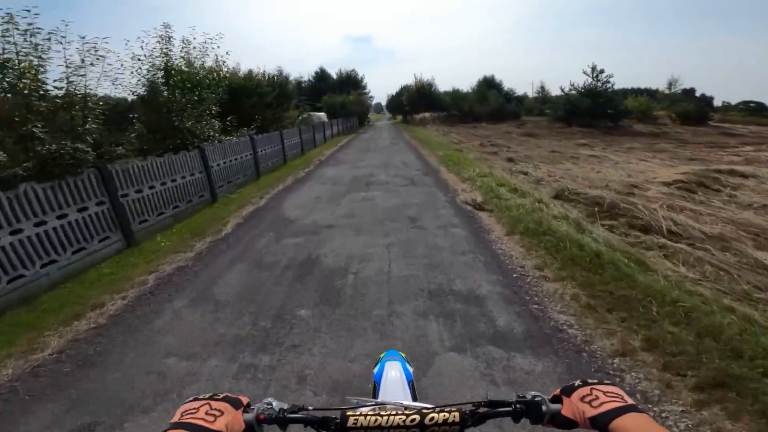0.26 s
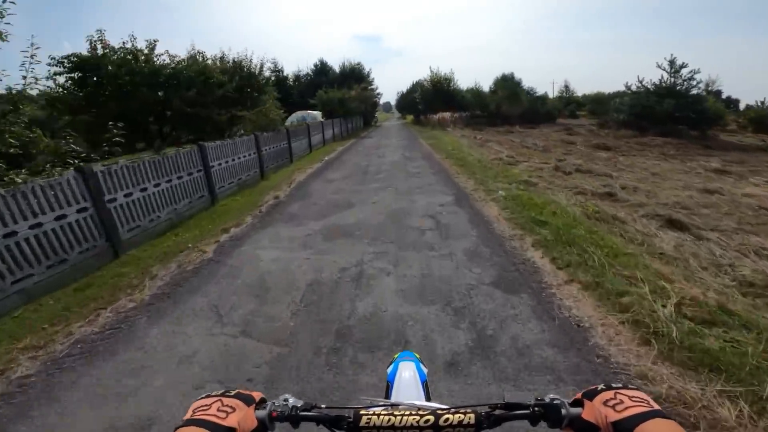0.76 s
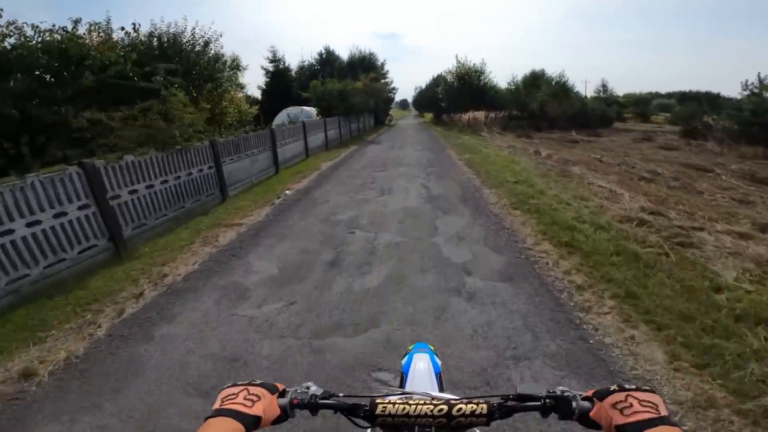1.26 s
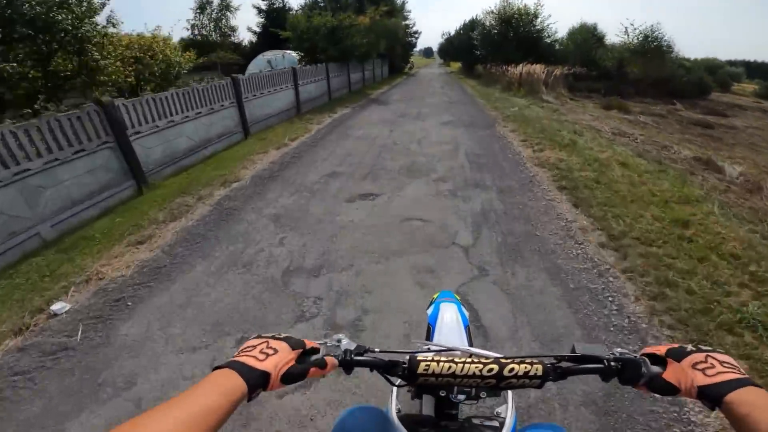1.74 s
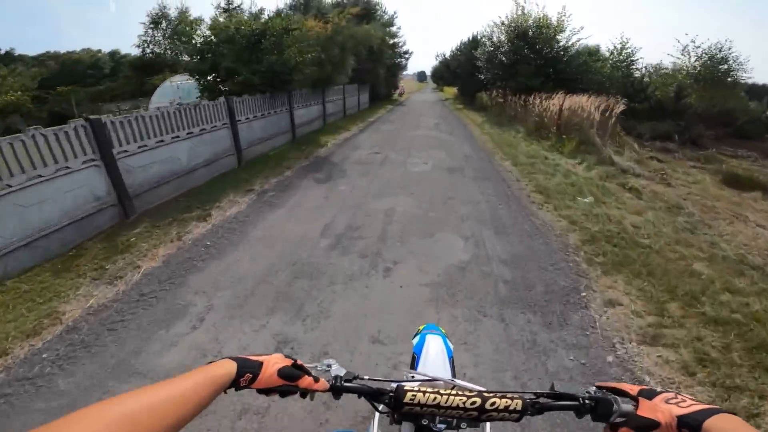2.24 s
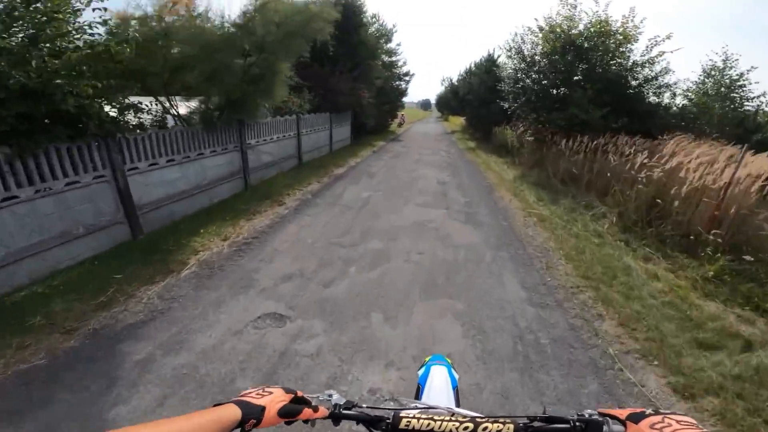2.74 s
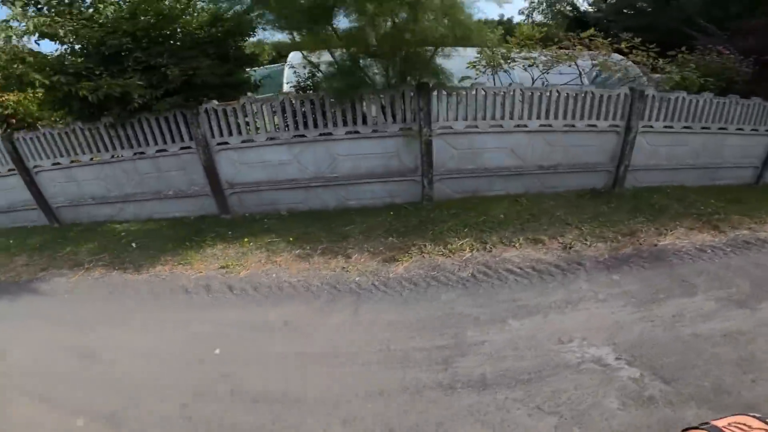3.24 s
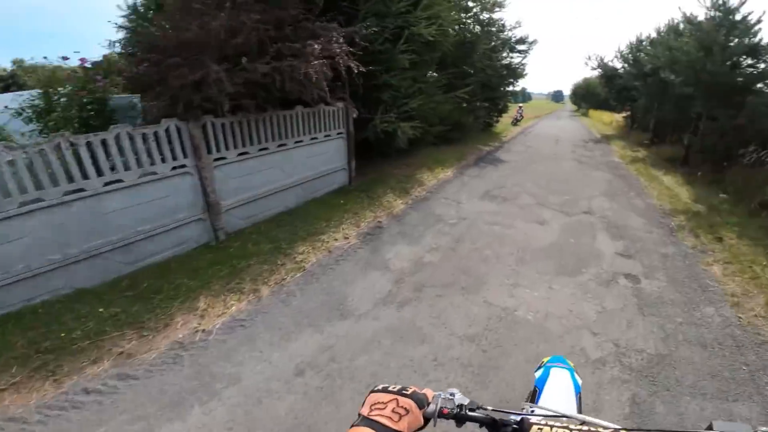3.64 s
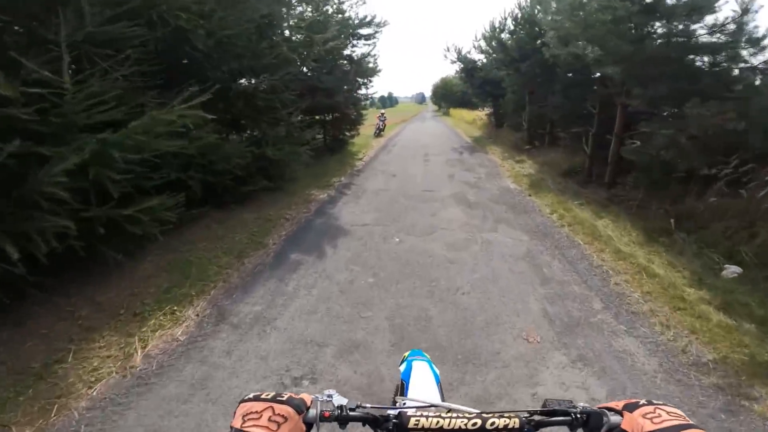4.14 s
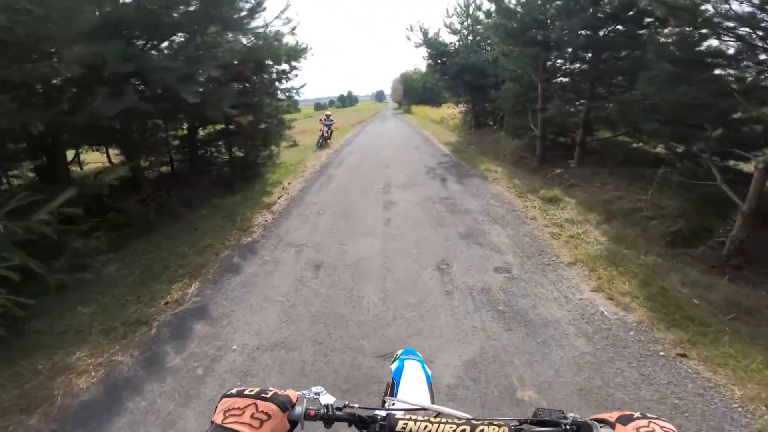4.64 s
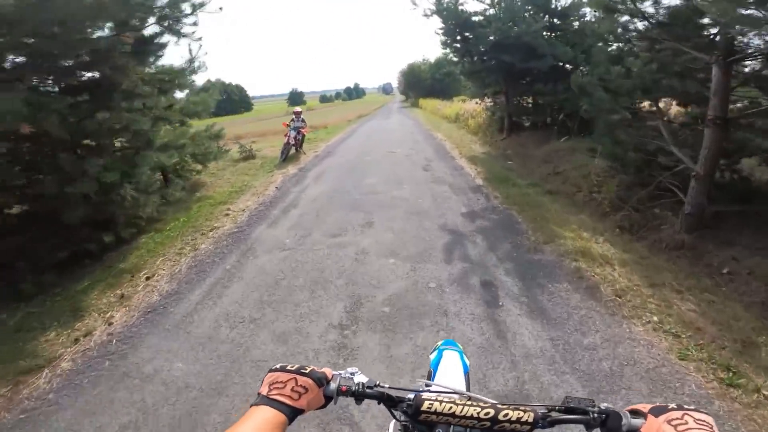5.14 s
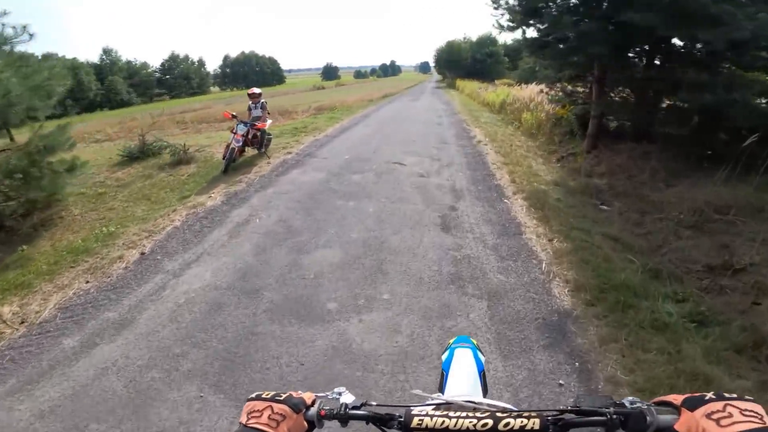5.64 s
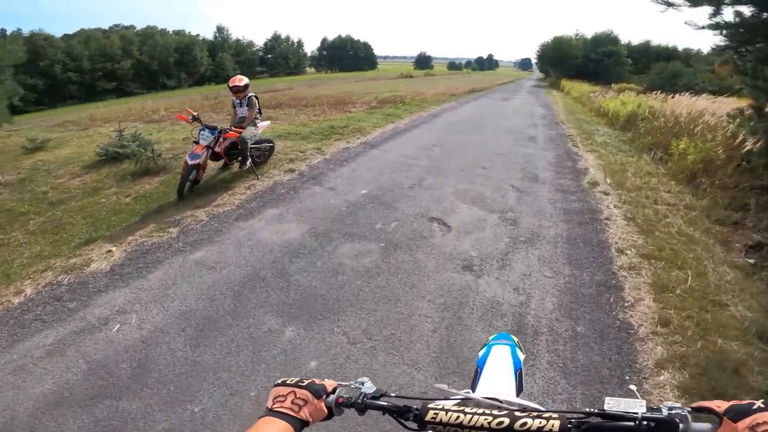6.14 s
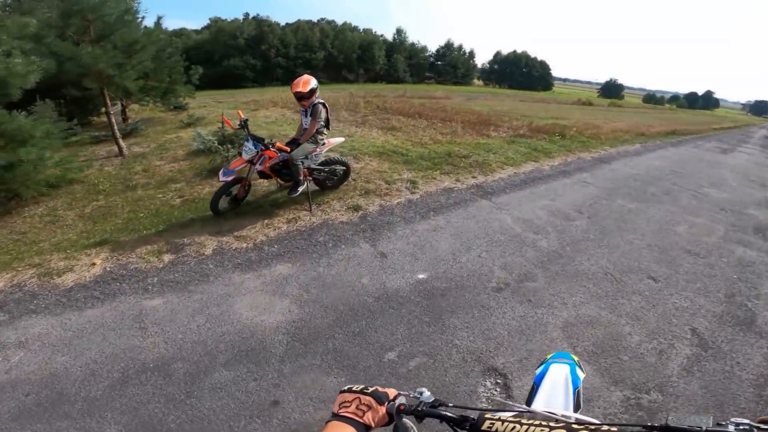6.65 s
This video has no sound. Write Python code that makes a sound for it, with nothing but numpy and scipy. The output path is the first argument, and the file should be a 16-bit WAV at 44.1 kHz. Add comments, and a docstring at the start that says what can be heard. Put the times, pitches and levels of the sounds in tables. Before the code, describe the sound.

Close helmet microphone on a small four-stroke dirt bike in the open air, no echo. The engine putters steadily with clatter, tyre roll and wind, then blips sharply and sinks to a weak idle. Side wind roars briefly as the rider turns his head, braking tyres rush with a thin disc whistle, and finally the rear tyre skids with a hoarse, juddering groan over grit.

```python
"""A single-cylinder dirt bike on a country lane, heard from the rider's helmet.
It cruises: gas pulses ring the exhaust, noise makes clatter, wind and tyre roll, a thin tone whines.
One rev sweeps the exhaust modes, the intake gasps and the chain rattles; the engine drops to idle.
Side wind, as shaped noise, roars while the rider turns his head; braking scrubs the tyres and
sings in the disc, then the rear tyre skids: friction-driven rubber resonances over grinding grit."""
import sys
import numpy as np
from scipy.fft import rfft, irfft, next_fast_len
from scipy.io import wavfile
from scipy.ndimage import uniform_filter1d, map_coordinates

SR = 44100
rng = np.random.default_rng(int(sys.argv[2]) if len(sys.argv) > 2 else 0)


def wav_out(sig):
    """Save sig, one row per channel (or a flat mono array), as 16-bit PCM at SR to the path in sys.argv[1]."""
    wavfile.write(sys.argv[1], SR, np.round(np.clip(np.atleast_2d(sig).T, -1, 1) * 32767).astype(np.int16))


N = 303923

# the throttle shuts and the engine settles to idle; each change takes SNAP_S (s)
SHUT_S, IDLE_S, SNAP_S = 1.665, 2.79, .03


def amp(db):
    """Level: decibels to amplitude gain."""
    return 10 ** (np.asarray(db) / 20)


def unit(x):
    """Normalisation: x at an rms of 1."""
    return x / np.sqrt(np.mean(x ** 2) + 1e-20)


def clock():
    """Sampling: the time of every sample in seconds."""
    return np.arange(N) / SR


def white():
    """White noise: equal power at every frequency."""
    return rng.standard_normal(N)


def wobble(rate):
    """Slow random modulation: a smooth curve through rate random knots a second."""
    return map_coordinates(rng.standard_normal(int(N * rate / SR) + 4), [clock() * rate])


def curve(points):
    """Linear interpolation: (time_s, value) points as one value per sample."""
    return np.interp(clock(), *np.transpose(points))


def after(s):
    """Transition: a quick fade from 0 to 1 at time s."""
    return np.clip((clock() - s) / SNAP_S, 0, 1)


def swells(rows, rise, fall, sag_db_per_s=0):
    """Exponential envelope: each (start_s, end_s, level_db) event rises, holds or sags, then decays."""
    t, gain = clock(), np.zeros(N)
    for start, end, db in rows:
        outside = np.maximum(start - t, 0) / rise + np.maximum(t - end, 0) / fall
        sagged_db = db - sag_db_per_s * np.maximum(t - start, 0)
        gain = np.maximum(gain, amp(sagged_db) * np.exp(-outside))
    return gain


def filtered(x, response):
    """Linear filtering: the spectrum of x times a response given as a function of frequency."""
    padded = next_fast_len(N + SR // 2)
    spectrum = rfft(x, padded) * response(np.fft.rfftfreq(padded, 1 / SR))
    return irfft(spectrum, padded)[:N]


def resonance(f, hz, width):
    """Damped oscillator: the frequency response of one mode."""
    return 1j * f * width / (hz * hz - f * f + 1j * f * width)


def ring(drive, modes):
    """Resonance: a drive through steep-sided modes (pitch_hz, width_hz, level_db), at rms 1."""
    def response(f):
        return sum(amp(db) * abs(resonance(f, hz, width)) ** 2 for hz, width, db in modes)
    return unit(filtered(drive, response))


def noise(colour):
    """Spectral shaping: noise of rms 1 through (frequency_hz, density_db) points."""
    hz, db = np.transpose(colour)

    def shape(f):
        return amp(np.interp(np.log(f + 1), np.log(hz), db, left=-120, right=-120))
    return unit(filtered(white(), shape))


def spurting_treble(x, patch_db, grain_db, edge_hz=2200):
    """Amplitude modulation: the treble of a noise comes in uneven spurts."""
    treble = filtered(x, lambda f: f ** 6 / (f ** 6 + edge_hz ** 6))
    spurts = unit(amp(patch_db * wobble(15) + grain_db * wobble(300)))
    return x - treble + treble * spurts


def sing(hz, waver_hz, waver_db):
    """Sustained resonance: a lightly damped mode whose pitch and strength wander."""
    phase = 2 * np.pi * np.cumsum(hz + waver_hz * wobble(30)) / SR
    return unit(amp(waver_db * wobble(23)) * np.sin(phase))


# engine speed: time_s, rate (firings per second)
FIRING_RATE = [(0.0, 24.63), (0.25, 24.5), (0.5, 25.17), (0.85, 24.37), (1.15, 24.42), (1.37, 25.2),
               (1.43, 31.98), (1.54, 36.43), (1.63, 42.24), (1.7, 40.63), (1.89, 34.76), (2.05, 31.5),
               (2.25, 24.82), (2.45, 19.27), (2.62, 15.2), (2.75, 11.4), (3.0, 14.0), (6.9, 13.0)]


def crank():
    """Phase as the integral of rate: the running count of four-stroke cycles, slightly irregular."""
    return np.cumsum(curve(FIRING_RATE)) / SR + .39 + .004 * wobble(20)


def revved(law):
    """Power law of speed: gain of an engine noise that grows with the revs and eases off the throttle."""
    db, db_per_doubling, shut_db = law
    doublings = np.log2(curve(FIRING_RATE) / FIRING_RATE[0][1])
    return amp(db + db_per_doubling * doublings + shut_db * after(SHUT_S))


# harder firings as the throttle bites and the engine nearly stalls: start_s, end_s, added strength level_db
HARD_FIRINGS = [(1.395, 1.42, -11), (2.53, 2.69, -8), (2.735, 2.77, -9)]
# gas pulses fall by a power of speed below a soft knee (firings per second)
KNEE_RATE, KNEE_POWER = 20.4, 1.21
# speed at which the modes have their listed pitch (firings per second); scatter between pulses (dB)
MID_RATE, SCATTER_DB = 32, 1.0


def pipe(cycles, modes, share, cut_hz=385, mouth_hz=52):
    """Impulse response of cavities: each cycle's gas pulses ring the modes, weaker as the revs fall."""
    age = np.arange(SR // 6) / SR
    rate = curve(FIRING_RATE)
    numbers = np.arange(1, np.floor(cycles[-1]))
    shares = np.interp(numbers, cycles, share)
    numbers, shares = numbers[shares > 0], shares[shares > 0]
    note = np.zeros(N + len(age))
    force = 1 + swells(HARD_FIRINGS, rise=.005, fall=0.021)
    for point, hz, width, push, follows in modes:
        samples = np.minimum(np.searchsorted(cycles, numbers + point), N - 1)
        for i, part, scatter in zip(samples, shares, rng.standard_normal(len(samples))):
            weakening = np.hypot(1, (KNEE_RATE / rate[i]) ** KNEE_POWER)
            flow = part * force[i] * amp(SCATTER_DB * scatter) / weakening
            pitch = hz * (rate[i] / MID_RATE) ** follows
            decaying_tone = np.sin(2 * np.pi * pitch * age) * np.exp(-np.pi * width * age)
            note[i:i + len(age)] += push * flow * decaying_tone

    def outlet(f):
        # the small outlet radiates little deep bass; the packing passes almost nothing above its cut
        return f ** 4 / (f ** 4 + mouth_hz ** 4) / np.sqrt(1 + (f / cut_hz) ** 16)
    return filtered(note[:N], outlet)


# silencer or air box modes rung by the gas pulses: point in the engine cycle (0-1 is one cycle), pitch_hz,
# width_hz, strength (+ push, - suck), power with which the pitch follows engine speed
CRUISING = [(0.0165, 240, 13.8, 0.26, 0), (-0.0695, 307, 20.3, -0.2, 0.026),
            (0.0793, 197, 92, -0.49, 0.006), (0.261, 115.5, 21.3, -0.62, 0.043)]
BITING = [(-.11, 113.5, 4.1, 0.12, 0.0044), (-.06, 322, 32, -.21, 0), (0.149, 276, 40, -.88, 0)]
ACCELERATING = [(0.043, 101, 10, 0.44, 0), (0.047, 318, 42, -0.65, 0), (0.257, 258, 11, -.14, 0.0053),
                (.12, 287, 19, 0.21, 0)]
PEAKING = [(0.099, 107, 16, 0.49, 0.0046), (-0.04, 314, 29, -0.32, 0), (0.203, 215, 91, -1.1, 0)]
LIFTING = [(.18, 116, 17, 0.45, 0.004), (.2, 245, 46, -0.78, 0), (.315, 326, 68, -.31, 0)]
OVERRUN = [(0.272, 118.4, 25.3, 0.71, 0.5), (0.204, 296, 44.4, -0.64, 0.45), (0.305, 97, 110, -0.69, 1.7),
           (0.459, 260, 7.7, 0.03, -0.116)]
LABOURING = [(0.226, 87, 24, 0.48, 0), (0.15, 218, 51, -0.11, 0.003), (.41, 251, 27, 0.2, 0),
             (.43, 270, 67, -.16, 0.0071)]
# the beats in turn: start_s, takeover_s, modes
BEATS = [(-1, .01, CRUISING), (1.37, .005, BITING), (1.48, .01, ACCELERATING), (1.58, .01, PEAKING),
         (1.665, .01, LIFTING), (1.78, .05, OVERRUN), (2.41, .05, LABOURING)]


def exhaust(cycles, level_db=0, idle_drop_db=-8, idle_fade_db_per_s=5):
    """Load-dependent excitation: the beat changes from cruise through the rev to a fading idle."""
    begun = [np.clip((clock() - start) / takeover + .5, 0, 1) for start, takeover, _ in BEATS]
    note = np.zeros(N)
    for (_, _, modes), this, following in zip(BEATS, begun, begun[1:] + [0]):
        note += pipe(cycles, modes, this - following)
    idle_db = after(IDLE_S) * (idle_drop_db - idle_fade_db_per_s * (clock() - IDLE_S))
    return amp(level_db + idle_db) * note


# relative level at cruising speed (dB), rise per doubling of speed (dB), change with the throttle shut (dB)
CLATTER_LAW, CASES_LAW = (-48.5, 3, -1.9), (-41.5, 2.8, -3.1)
# spectrum of the clatter: frequency_hz, density_db
CLATTER_COLOUR = [(820, -32), (1400, 2.5), (1560, -4.5), (2200, -1), (2590, -11.5), (3160, -6),
                  (3680, -12.5), (4680, -11), (6530, -21.5), (7220, -22), (11200, -31.5), (13500, -36),
                  (15500, -35.5)]
# bursts of engine rattle at changes of load: start_s, end_s, relative level_db
RATTLES = [(.47, .8, -60), (1.385, 1.435, -52), (1.665, 1.77, -49.5)]
# ringing of the engine cases: pitch_hz, width_hz, level_db
CASE_MODES = [(1128, 16, 1.5), (1248, 33, -5), (1890, 130, -20), (3430, 60, -22.5)]
# the cases ring up as the revs sweep past: start_s, end_s, relative level_db
CASE_SWELLS = [(1.545, 1.585, -32), (1.705, 1.735, -33.5), (1.87, 1.92, -34.5), (2.03, 2.14, -42),
               (2.5, 2.62, -54)]
# a loose part sings: start_s, end_s, relative level_db
LOOSE_SWELLS = [(.47, .67, -35.5), (1.35, 1.46, -38.5), (1.72, 1.87, -41)]


def mechanics(cycles, depth_db=2, rough_db=-0.5, clatter_db=2, ring_db=-1, drift_db=2.1, firing_db=-0.5,
              tone_db=-3, modes_db=-3):
    """Structure-borne sound: valves and piston clatter each crank turn; cases and a loose part ring."""
    # two crank turns make one cycle
    beat = unit(amp(depth_db * np.cos(4 * np.pi * cycles) + rough_db * wobble(250)))
    ragged = unit(amp(2.5 * wobble(200)))
    rattle = revved(CLATTER_LAW) + ragged * swells(RATTLES, rise=0.011, fall=0.064)
    clatter = amp(clatter_db + drift_db * wobble(21.16)) * rattle * beat * noise(CLATTER_COLOUR)

    case_gain = revved(CASES_LAW) + swells(CASE_SWELLS, rise=0.014, fall=0.02)
    firing = unit(amp(firing_db * np.cos(2 * np.pi * (cycles - .25))))
    case_tone = amp(tone_db) * sing(hz=1102, waver_hz=5, waver_db=-1.5)
    case_ring = amp(modes_db) * ring(beat * white(), CASE_MODES)
    cases = case_gain * firing * (case_tone + case_ring)

    loose_gain = swells(LOOSE_SWELLS, rise=0.11, fall=0.033)
    loose_part = loose_gain * ring(white(), [(1005, 42, 0)])
    return clatter + amp(ring_db) * (cases + loose_part)


def gears(whine_db=-62, whine_hz=4720, width_hz=90):
    """Narrow-band resonance: the gears sing thinly while they carry load."""
    return amp(whine_db) * (1 - after(SHUT_S)) * ring(white(), [(whine_hz, width_hz, 0)])


# strength of wind buffeting and tyre roll: time_s, share of the opening strength
AIR_AND_ROLL = [(0, 1), (4.8, 0.82), (5.4, 1), (5.75, 0.59), (6.2, 0.83), (6.52, 0.15), (6.9, 0.2)]
# spectrum of the buffeting: frequency_hz, density_db
BUFFET_COLOUR = [(10, -3.5), (25, -16), (55, -7), (85, -9.5), (140, -14.5), (400, -57)]
# large eddies on the microphone: start_s, end_s, level_db
EDDIES = [(2.35, 2.65, -33), (3.31, 3.5, -24), (3.59, 3.66, -25.5), (4.25, 4.3, -21.5), (4.6, 5.0, -33),
          (5.33, 5.44, -24.5)]
# side wind while the head is turned: start_s, end_s, level_db
HEAD_TURN = [(3.255, 3.5, -20), (3.56, 3.65, -22)]
# spectrum of the side wind: frequency_hz, density_db
GUST_COLOUR = [(41, -22), (70, -3.5), (222, -6), (482, -15.5), (601, -13.5), (702, -15.5), (1020, -15),
               (1820, -31.5), (2170, -27.5), (2540, -38), (3030, -33), (4720, -38.5), (6030, -48),
               (7200, -48), (14000, -74)]


def wind(buffet_db=-27, gust_db=0, flutter_db=1.65, drift_db=1.5, strength_power=1.36):
    """Turbulent pressure: buffeting follows its strength curve; eddies and side wind add at set levels."""
    steady = amp(buffet_db + drift_db * wobble(4.5)) * np.abs(curve(AIR_AND_ROLL)) ** strength_power
    buffet = (steady + swells(EDDIES, rise=0.023, fall=0.037)) * noise(BUFFET_COLOUR)
    flutter = unit(amp(flutter_db * wobble(55)))
    gust_gain = amp(gust_db) * swells(HEAD_TURN, rise=0.032, fall=0.13, sag_db_per_s=2)
    gust = gust_gain * flutter * spurting_treble(noise(GUST_COLOUR), patch_db=2.0, grain_db=1.5)
    return buffet + gust


# level at cruising speed (dB), rise per doubling of engine speed (dB), change with the throttle shut (dB)
ROAR_LAW = (-29, 2.4, -6)
# spectra of the rolling and of the scrubbing tyres: frequency_hz, density_db
ROAD_COLOUR = [(60, -4.5), (110, -8.5), (170, -6), (230, 10), (330, 7.5), (480, -2.5), (660, -1.5),
               (830, -4), (950, -6), (1150, -7), (1270, -10), (1400, -24.5), (1700, -29.5), (2600, -42.5)]
RUSH_COLOUR = [(82, -36), (140, -11.5), (206, 1), (264, -5), (297, -5.5), (436, -11), (519, -5.5),
               (693, -12.5), (1140, -12), (1590, -33.5), (2520, -33.5), (4850, -32), (6350, -43),
               (7270, -42.5), (14000, -62.5)]
# brake pressure, which drives tyre scrub and disc whistle: time_s, relative level_db
BRAKING = [(2.7, -15.5), (3.7, -7), (3.95, -7.5), (4.3, -6), (4.8, -1.5), (5.36, -2), (5.7, -15),
           (6.2, -37)]


def road(roll_db=-37, rush_db=-22, rough_db=1):
    """Contact noise: knobbly tyres roll over asphalt and scrub with the braking; a mid-band roar of the
    engine's breath follows the revs."""
    drive = revved(ROAR_LAW)
    rolling = np.hypot(amp(roll_db) * curve(AIR_AND_ROLL), drive) * noise(ROAD_COLOUR)
    rush = spurting_treble(noise(RUSH_COLOUR), patch_db=1.5, grain_db=2)
    scrubbing = amp(rush_db + curve(BRAKING)) * rush
    return unit(amp(rough_db * wobble(70))) * (rolling + scrubbing)


# a blow rings the brake disc briefly: start_s, end_s, level_db
DISC_PINGS = [(.835, .85, -58), (1.38, 1.39, -61), (4.885, 4.915, -54), (6.39, 6.4, -64)]


def brake(level_db=-56, waver_db=2.5):
    """Friction-excited plate modes: the pads draw a thin whistle from the disc, louder under braking."""
    whistle = ring(white(), [(7070, 170, -1.5), (7230, 210, -4.5)])
    pressure = amp(level_db + curve(BRAKING)) * unit(amp(waver_db * wobble(7.1)))
    return (pressure + swells(DISC_PINGS, rise=.003, fall=.01)) * whistle


# chain slaps and flung stones: start_s, level_db, pitch_hz
TICKS = [(0.4938, -31.5, 3900), (0.785, -41, 4790), (0.981, -41, 4550), (1.36, -39.5, 4040),
         (1.38, -32, 4520), (1.3993, -32.5, 4980), (1.417, -38, 4250), (1.433, -41, 3620),
         (1.5705, -37, 4620), (1.661, -42, 3650), (1.776, -42, 4770), (2.224, -42.5, 4220),
         (3.128, -40, 4330), (3.263, -36, 3010), (3.397, -34, 4130), (3.4352, -32, 3850),
         (3.5133, -32, 3100), (3.528, -36.5, 3070), (3.5984, -37, 4570), (3.778, -36.5, 3130),
         (3.91, -40, 4400), (4.433, -37.5, 4210), (4.9015, -30, 4680), (6.393, -35, 6640)]
# spectrum of the blows: frequency_hz, density_db
TICK_COLOUR = [(800, -39.5), (2000, 6), (4500, 9.5), (6000, 2), (7200, -14.5), (9000, -12), (13000, -26.5),
               (15500, -31)]


def ticks(decay=0.0063, rise=0.00094, ring_db=-5, ring_decay=0.011, ring_width_hz=900):
    """Impact and free decay: bright clacks from chain and stones, each with a brief ring of its own."""
    blows, rings = np.zeros(N), np.zeros(N)
    # a random factor spreads each ring from a pure tone into a band
    fuzz = unit(filtered(white(), lambda f: 1 / (1 + (2 * f / ring_width_hz) ** 2)))
    age = np.arange(SR // 12) / SR
    for s, db, hz in TICKS:
        first = round(s * SR)
        span = slice(first, first + len(age))
        onset = amp(db) * (1 - np.exp(-age / rise))
        blows[span] += onset * np.exp(-age / decay)
        rings[span] += onset * np.exp(-age / ring_decay) * np.sin(2 * np.pi * hz * age)
    return blows * noise(TICK_COLOUR) + amp(ring_db) * rings * fuzz


# gasps of the intake: start_s, end_s, level_db
GASPS = [(1.403, 1.445, -32), (1.67, 1.75, -30.5)]
# their spectrum: frequency_hz, density_db
GASP_COLOUR = [(380, -19), (450, 7), (680, 4), (900, -6), (1250, -2), (1600, -31), (2500, -33)]


def intake(level_db=0):
    """Jet noise: air gasps through the carburettor when the slide snaps open or shut."""
    return amp(level_db) * swells(GASPS, rise=0.011, fall=0.045) * noise(GASP_COLOUR)


# the slack chain sizzles over its sprockets: start_s, end_s, level_db
LASHES = [(1.56, 1.63, -49), (1.665, 1.76, -47)]
# its spectrum: frequency_hz, density_db
LASH_COLOUR = [(2200, -14), (3500, 5), (5500, -2.5), (6800, -8.5), (8500, -11), (11000, -23.5),
               (13500, -26), (15500, -31)]


def chain(rough_db=2.5):
    """Dense random impacts: the slack chain rattles over the sprockets around the throttle's closing."""
    roughness = unit(amp(rough_db * wobble(350)))
    return swells(LASHES, rise=0.014, fall=.09) * roughness * noise(LASH_COLOUR)


# pitch of the sliding tyre: time_s, body, tread and knobs (each in semitones)
TYRE_BEND = [(5.33, -2, -0.79, .5), (5.53, -.5, -0.037, .5), (5.78, 0.5, -0.19, -.5),
             (5.97, -0.06, 0.039, 0), (6.149, 4, -0.18, .4), (6.35, 1.36, 0.17, .5),
             (6.547, 2, -0.21, 0.24), (6.848, 3, .7, .9)]


def rubbed(modes, bend, waver=.25, firmness=0.23):
    """Stick-slip resonance: friction keeps rubber modes ringing and evens them; bend is in semitones."""
    semitones = np.interp(clock(), np.transpose(TYRE_BEND)[0], bend) + waver * wobble(9)
    # reading the ringing faster or slower bends its pitch
    travel = np.cumsum(2 ** (semitones / 12))
    x = map_coordinates(ring(white(), modes), [travel], order=1, mode="mirror")
    strength = np.sqrt(np.abs(uniform_filter1d(x ** 2, size=900)) + 1e-6)
    return unit(x / strength ** np.clip(firmness, 0, 1))


# slides of the rear tyre: start_s, end_s, relative level_db
SLIDES = [(5.48, 6.12, 1), (6.39, 6.79, -1)]
# time constants with which a slide builds up and lets go (s)
BITE_S, LET_GO_S = 0.12, 1
# resonances of the tyre body, tread and knobs: pitch_hz, width_hz, level_db
CARCASS = [(168, 60, -7.5), (268, 35, -7), (335.5, 125, 5.5), (453.2, 88, -6)]
TREAD = [(580, 63, -3), (702, 80, 0.5), (783, 57, 2.5), (883, 135, -3)]
KNOBS = [(1119, 137, -1), (1351, 140, -19)]
# the tread gives an extra note near 580 Hz early in the first slide: start_s, end_s, level_db
TREAD_NOTES = [(5.5, 5.86, -26.5)]
# loose grit dragged under the sliding tyre: start_s, end_s, level_db
GRINDING = [(5.75, 6.5, -37.5)]
# spectrum of the grit: frequency_hz, density_db
GRIT_COLOUR = [(850, -27), (1450, 1), (1680, -6.5), (1890, -2), (2190, -1.5), (2480, -12), (2680, -12),
               (3020, -11), (3670, -17.5), (4510, -19), (5810, -27.5), (7950, -34), (15000, -50)]
# resonances of the scraping grit: pitch_hz, width_hz, level_db
SCRAPE = [(1930, 130, -3.5), (2200, 190, 0)]


def skid(carcass_db=-20.5, tread_db=-20.0, knobs_db=-29.0, carcass_sag_db=2.5, tread_sag_db=7,
         knobs_sag_db=4, grip_db=0.63, scrape_db=-8):
    """Stick-slip friction: slipping tread rings the tyre and grinds grit; each part bends and sags."""
    judder = np.sin(2 * np.pi * 73 * clock() + 2 * wobble(5))
    slips = unit(amp(.8 * wobble(400) + .6 * wobble(45) + 1.2 * judder))
    _, body_bend, tread_bend, knob_bend = np.transpose(TYRE_BEND)
    # modes, bend (semitones), level (dB), sag (dB per s)
    parts = [(CARCASS, body_bend, carcass_db, carcass_sag_db),
             (TREAD, tread_bend, tread_db, tread_sag_db),
             (KNOBS, knob_bend, knobs_db, knobs_sag_db)]
    tyre = np.zeros(N)
    for modes, bend, db, sag in parts:
        grip = amp(db + grip_db * wobble(14))
        tyre += swells(SLIDES, BITE_S, LET_GO_S, sag) * grip * rubbed(modes, bend)
    tyre += swells(TREAD_NOTES, rise=0.063, fall=0.05) * rubbed([(579, 40, 0)], tread_bend)
    scrape = amp(scrape_db) * ring(white(), SCRAPE)
    grit = swells(GRINDING, rise=0.59, fall=1.0) * (noise(GRIT_COLOUR) + scrape)
    return slips * (tyre + grit)


def scene():
    """Superposition: all sources add at the microphone, in the open air without echoes."""
    cycles = crank()
    engine = exhaust(cycles) + mechanics(cycles) + gears() + intake() + chain()
    surroundings = wind() + road() + brake() + ticks() + skid()
    return (engine + surroundings)[None]


def record(dry, ceiling=.85, top_hz=15700):
    """Saturation and band limiting: the tallest peaks are rounded off; nothing passes above top_hz."""
    rounded = dry[0] / (1 + (dry[0] / ceiling) ** 8) ** (1 / 8)
    return filtered(rounded, lambda f: f < top_hz)[None]


dry = scene()
out = record(dry)
wav_out(out)
```